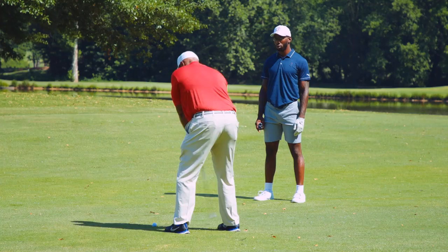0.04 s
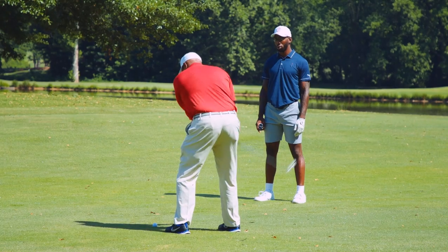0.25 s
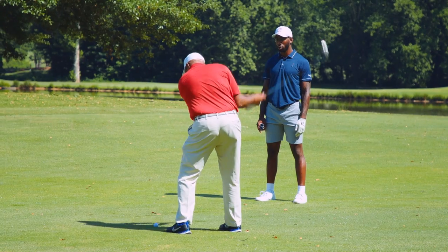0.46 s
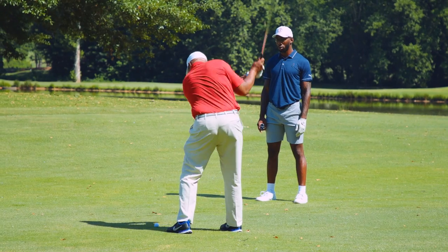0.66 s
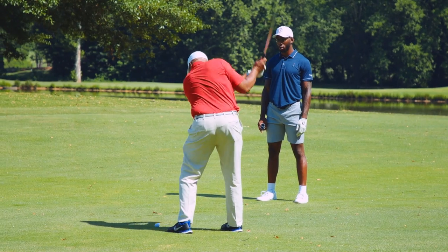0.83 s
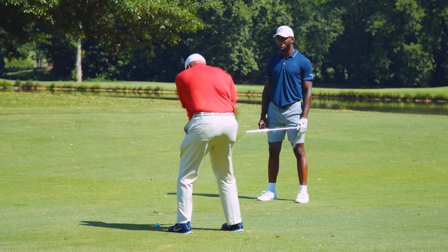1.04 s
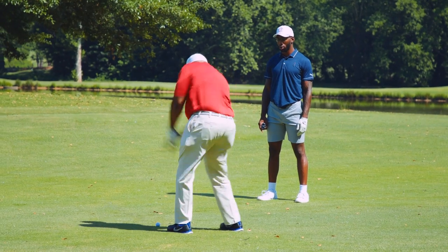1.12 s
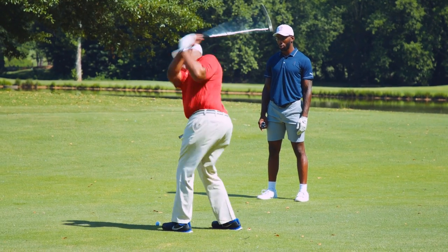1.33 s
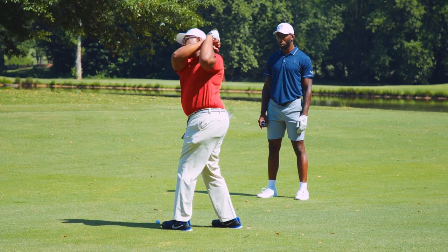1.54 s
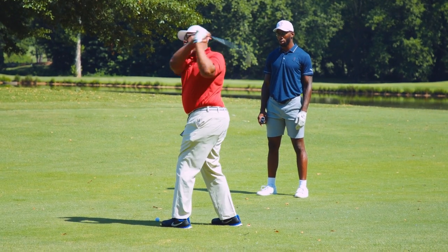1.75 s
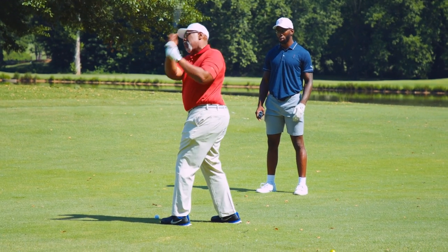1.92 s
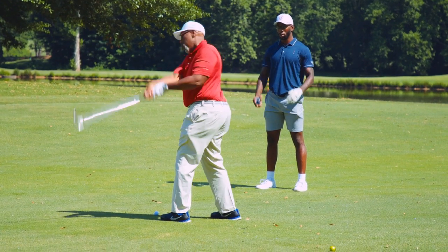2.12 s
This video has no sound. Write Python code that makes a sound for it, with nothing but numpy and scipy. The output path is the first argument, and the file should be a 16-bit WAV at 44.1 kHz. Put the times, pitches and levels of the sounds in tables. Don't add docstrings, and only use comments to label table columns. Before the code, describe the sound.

Clothing rustle and body jolts of a golf swing on an open fairway, very close and mono; near-quiet first, a rumbling burst of fabric rub and thuds midway, then crisp settling ticks.

```python
import sys
import numpy as np
from scipy import signal
from scipy.fft import rfft, irfft
from scipy.io import wavfile
from scipy.ndimage import uniform_filter1d

SR = 44100
rng = np.random.default_rng(int(sys.argv[2]) if len(sys.argv) > 2 else 0)


def master(y):
    cut = np.clip(np.atleast_2d(y).T, -1, 1)
    pcm = np.round(cut * 32767)
    wavfile.write(sys.argv[1], SR, pcm.astype(np.int16))


def gain_from_db(level_db):
    decades = np.asarray(level_db, float) / 20
    return 10 ** decades


N = 96314


def curve(points):
    points = np.array(points, float)
    return gain_from_db(np.interp(np.arange(N) / SR, points[:, 0], points[:, 1]))


def unit(x):
    return x / np.sqrt(np.mean(x ** 2))


def walk(rate_hz):
    hold = int(SR / rate_hz)
    steps = np.repeat(rng.standard_normal(N // hold + 1), hold)
    slewed = uniform_filter1d(uniform_filter1d(steps, hold), hold)
    return unit(slewed[:N])


def colour(x, points, shared_db, own_db, rate_hz):
    points = np.array(points, float)
    hz = np.arange(N // 2 + 1) * SR / N + 1
    level_db = np.interp(np.log(hz), np.log(points[:, 0]), points[:, 1], left=-90, right=-90)
    spectrum = rfft(x) * gain_from_db(level_db)
    swell = walk(rate_hz)
    out = 0
    for octave in range(4, 15):
        share = np.clip(1 - abs(np.log2(hz) - octave), 0, 1)
        band = irfft(spectrum * share, N)
        flicker = walk(2 * rate_hz)
        out = out + band * gain_from_db(shared_db * swell + own_db * flicker)
    return unit(out)


def fibres(snap_share):
    snaps_per_s, scatter_db, limit = 2500, 3.0, 2.1
    size = gain_from_db(scatter_db * np.minimum(rng.exponential(size=N), limit))
    happens = rng.random(N) < snaps_per_s / SR
    snaps = happens * np.clip(rng.standard_normal(N), -limit, limit) * size
    hiss = rng.standard_normal(N)
    return np.sqrt(snap_share) * unit(snaps) + np.sqrt(1 - snap_share) * hiss


# freq_hz, density_db (per Hz)
AIR_COLOUR = [(70, -12), (130, -2), (400, -6), (1150, -17.5), (3800, -19.5), (6000, -22), (8000, -37.5),
              (13000, -50)]


def air():
    breeze = colour(rng.standard_normal(N), AIR_COLOUR, shared_db=0.8, own_db=0.66, rate_hz=5.97)
    return gain_from_db(-62.5) * breeze


# start_s, length_s, from_hz, to_hz, level_db
WHISTLES = [(0, .07, 3850, 3850, -72), (.08, .075, 4600, 3950, -70), (.105, .015, 4350, 4200, -66),
            (.14, .014, 4300, 3900, -68), (.15, .04, 3950, 3800, -74), (.183, .035, 3780, 3720, -65),
            (.215, .045, 3720, 3700, -70), (.3, .11, 3700, 3700, -73), (.385, .025, 3720, 3700, -69),
            (.458, .022, 3700, 3600, -67), (.52, .09, 3650, 3650, -72), (.59, .02, 2700, 2850, -66),
            (.632, .03, 3250, 3000, -65), (.653, .025, 2550, 2430, -66), (.645, .016, 3200, 2950, -62),
            (.745, .13, 2320, 2340, -70), (.9, .1, 2330, 2330, -78), (.945, .04, 3850, 3850, -75),
            (1.09, .04, 3480, 3230, -60), (1.124, .046, 3270, 2970, -53), (1.108, .095, 4080, 3660, -57),
            (1.17, .11, 3790, 3500, -54), (1.18, .035, 3250, 2700, -54), (1.255, .02, 3560, 3520, -54),
            (1.408, .012, 1300, 1500, -36), (1.417, .02, 1600, 1250, -40), (1.535, .02, 2150, 2300, -48),
            (1.565, .04, 2330, 2280, -46), (1.785, .016, 2900, 2680, -52), (1.81, .016, 2550, 2450, -54),
            (2.068, .028, 6250, 5950, -60), (2.093, .016, 5950, 5450, -58), (2.112, .014, 5150, 4800, -61)]


def whistles():
    t = np.arange(N) / SR
    wobble = 1 + 0.016 * walk(400.0)
    flutter = gain_from_db(3.0 * walk(350.0))
    out = 0
    for start_s, length_s, from_hz, to_hz, level_db in WHISTLES:
        progress = np.clip((t - start_s) / length_s, 0, 1)
        pitch_hz = (from_hz + (to_hz - from_hz) * progress) * wobble
        phase = 2 * np.pi * np.cumsum(pitch_hz) / SR
        swell = np.sin(np.pi * progress) ** 0.5
        out = out + gain_from_db(level_db) * swell * np.sin(phase)
    return out * flutter


# time_s, level_db, brightness_db
DRAG = [(0, -89, 6), (.5, -64.5, 5.5), (.58, -71.5, 8), (.67, -68, 10.5), (.74, -75, 8), (1.07, -68, 3.5),
        (1.2, -44.5, -1.5), (1.3, -39, 2), (1.32, -34, -7), (1.37, -39, 3), (1.41, -35, -3.5),
        (1.5, -41.5, 2.5), (1.6, -39, -22), (1.65, -49, -27), (1.76, -50.5, -9), (1.91, -43.5, -10),
        (2.0, -50, 0), (2.18, -54.5, -2.5)]
# freq_hz, density_db (per Hz)
DRAG_COLOUR = [(150, -19), (250, -10.5), (562, -13.5), (802, -16), (928, -18), (1410, -19.5), (4920, -24),
               (6590, -29), (12000, -59), (15600, -73), (22000, -120)]


def drag():
    rub = colour(fibres(0.47), DRAG_COLOUR, shared_db=1.5, own_db=1.2, rate_hz=30.0)
    hz = np.arange(N // 2 + 1) * SR / N
    sheen_hz = 4660
    sheen = irfft(rfft(rub) / (1 + (sheen_hz / (hz + 1)) ** 6), N)
    body = rub - sheen
    brightness = curve(np.array(DRAG)[:, ::2])
    return curve(DRAG) * (body + sheen * brightness)


# time_s, level_db
BUFFET = [(0, -60), (.25, -55.5), (.33, -54), (.8, -56), (1.1, -51), (1.14, -43.5), (1.21, -31.5),
          (1.32, -33), (1.36, -19.5), (1.41, -35.5), (1.44, -29.5), (1.5, -32), (1.65, -42), (1.76, -44),
          (1.92, -34.5), (1.97, -46), (2.18, -45.5)]
# freq_hz, density_db (per Hz)
BUFFET_COLOUR = [(12, -37), (20, -7.5), (38, -1), (87, -2.5), (161, -9.5), (205, -15), (240, -17),
                 (900, -29), (1170, -59), (1980, -120)]


def buffet():
    rumble = colour(rng.standard_normal(N), BUFFET_COLOUR, shared_db=2.0, own_db=1.0, rate_hz=22.0)
    return curve(BUFFET) * rumble


# start_s, peak_db, centre_hz, width_hz, length_s
TICKS = [(.66, -55, 5500, 7000, .014), (.679, -48, 6500, 7000, .001), (.682, -50, 6500, 6000, .001),
         (.858, -56, 5000, 8000, .001), (1.316, -30, 3500, 6000, .008), (1.57, -33, 3000, 5000, .003),
         (1.22, -30, 7300, 3300, .001), (1.247, -37, 5000, 5500, .001), (1.281, -42, 6500, 5000, .001),
         (1.288, -25, 2200, 4000, .001), (1.596, -28, 2800, 6000, .001), (1.594, -48, 11000, 8000, .006),
         (1.643, -42, 8000, 12000, .001), (1.95, -46, 9000, 10000, .003), (1.974, -46, 13000, 6000, .001),
         (1.982, -39, 10000, 13000, .003), (1.989, -29, 7000, 12000, .001), (2.0125, -33, 1400, 3000, .001),
         (2.024, -37, 5000, 9000, .001), (2.035, -30, 1300, 3000, .001), (2.046, -43, 8000, 7000, .001),
         (2.054, -34, 4800, 6500, .001), (2.0705, -36, 3600, 4500, .001), (2.118, -39, 8000, 13000, .001),
         (2.136, -42, 1500, 1500, .0016)]
# start_s, peak_db, centre_hz, width_hz, length_s
SURGES = [(.013, -56, 3200, 800, .004), (.032, -56, 3250, 800, .004), (.05, -57, 3150, 700, .005),
          (.46, -59, 5500, 7000, .04), (1.346, -30, 1500, 5000, .008), (1.405, -32, 2500, 6000, .008),
          (1.22, -33, 3200, 1600, .001), (1.295, -28, 700, 1200, .002), (1.351, -24, 550, 800, .003),
          (1.355, -28, 1500, 1600, .004), (1.447, -28, 700, 1200, .003), (1.466, -30, 700, 1200, .006),
          (2.153, -43, 1400, 1800, .003), (.995, -58, 5000, 6000, .001), (.909, -58, 2500, 1500, .001),
          (2.112, -46, 2500, 3500, .001), (1.372, -33, 2500, 6500, .015), (2.011, -46, 11000, 10000, .001),
          (1.485, -37, 3000, 5000, .004), (1.544, -38, 3000, 4000, .004), (2.054, -45, 12000, 7000, .001),
          (2.092, -47, 9000, 10000, .001), (2.039, -47, 11000, 9000, .001)]


def ticks():
    rows = list(TICKS) + list(SURGES)
    span, lead, onset = 4096, 80, 64
    snap_size, snap_below_s = 5.0, 0.0015
    t = np.arange(span) / SR
    hz = np.arange(span // 2 + 1) * SR / span + 1
    out = np.zeros(N)
    for start_s, peak_db, centre_hz, width_hz, length_s in rows:
        age = np.maximum(t - onset / SR, 0) / length_s
        push = rng.standard_normal(span) * age * np.exp(-1.5 * age ** 2)
        if length_s < snap_below_s:
            push[lead] += snap_size
        resonance = np.exp(-(1.6 * (hz - centre_hz) / width_hz) ** 4)
        burst = irfft(rfft(push) * resonance, span)
        start = int(start_s * SR) - lead
        room = min(span, N - start)
        out[start:start + room] += gain_from_db(peak_db) * burst[:room] / abs(burst).max()
    return out


# centre_s, peak_db, pitch_hz, length_s
THUMPS = [(1.136, -34, 90, 0.0048), (1.147, -34.5, 60, 0.0059), (1.17, -33, 108, 0.0058),
          (1.177, -29, 90, 0.0058), (1.193, -29, 55, .007), (1.212, -22.5, 55, .007),
          (1.241, -28, 70, 0.0065), (1.256, -17.5, 108, 0.0044), (1.27, -21.5, 65.3, 0.0052),
          (1.294, -21, 39.8, 0.01), (1.353, -22.5, 333, 0.0016), (1.363, -27, 236, 0.0049),
          (1.388, -27, 246, 0.0063), (1.438, -26, 240, .003), (1.301, -21, 254, 0.00096),
          (1.323, -19, 285, 0.0025), (1.338, -14, 66.3, 0.011), (1.35, -9, 136, 0.0022),
          (1.3567, -6.5, 95, 0.003), (1.379, -17.5, 62, 0.011), (1.399, -8, 69, 0.008),
          (1.421, -19.5, 50, 0.0031), (1.47, -18.5, 180, 0.0024), (1.507, -21.5, 68.6, 0.0057),
          (1.557, -25, 67, 0.0078), (1.777, -39.5, 182, .008), (1.863, -39, 400, 0.0047),
          (1.198, -40, 437, .008), (1.222, -38, 397, .006), (1.823, -36, 70, 0.0054),
          (2.02, -38.5, 62, 0.0062), (1.595, -30, 210, 0.0025), (1.857, -33.5, 174, 0.0024),
          (1.873, -35, 285, 0.007), (1.905, -40, 108, 0.022)]


def thumps():
    t = np.arange(N) / SR
    out = 0
    for centre_s, peak_db, pitch_hz, length_s in THUMPS:
        since = t - centre_s
        bump = np.exp(-0.5 * (since / length_s) ** 2)
        out = out - gain_from_db(peak_db) * bump * np.cos(2 * np.pi * pitch_hz * since)
    return out


# time_s, level_db
BRUSH = [(1.2, -100), (1.35, -84), (1.5, -78), (1.6, -72.5), (1.67, -74), (1.8, -69), (1.92, -62.5),
         (2.02, -64), (2.18, -68.5)]
# freq_hz, density_db (per Hz)
BRUSH_COLOUR = [(3000, -41), (6000, 0.5), (9000, 0.5), (12000, -2), (16000, -10)]


def brush():
    crackle = colour(fibres(0.3), BRUSH_COLOUR, shared_db=-0.2, own_db=-2.0, rate_hz=27.0)
    return curve([(0.0047, -110)] + list(BRUSH)) * crackle


def scene():
    mix = drag() + buffet() + brush() + thumps() + ticks() + whistles() + air()
    return mix[None]


def top_cut(x):
    return signal.sosfilt(signal.butter(12, 15860, fs=SR, output="sos"), x)


def record(dry):
    headroom = 0.72
    mix = headroom * np.tanh(dry / headroom)
    return top_cut(mix)


dry = scene()
out = record(dry)
master(out)
```